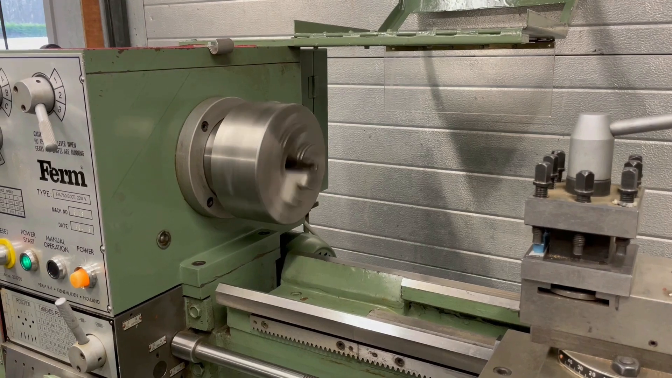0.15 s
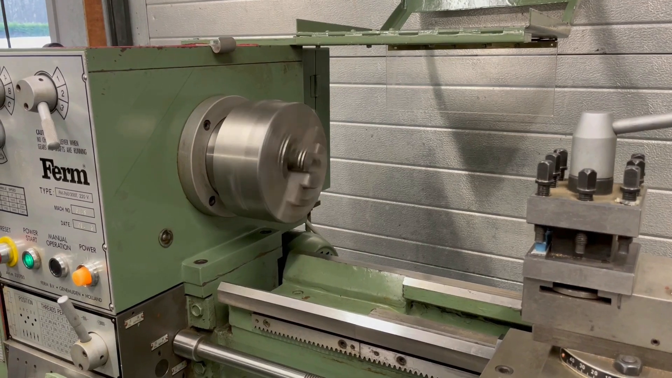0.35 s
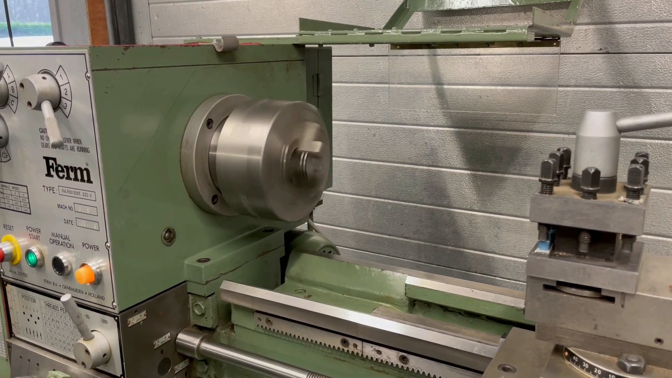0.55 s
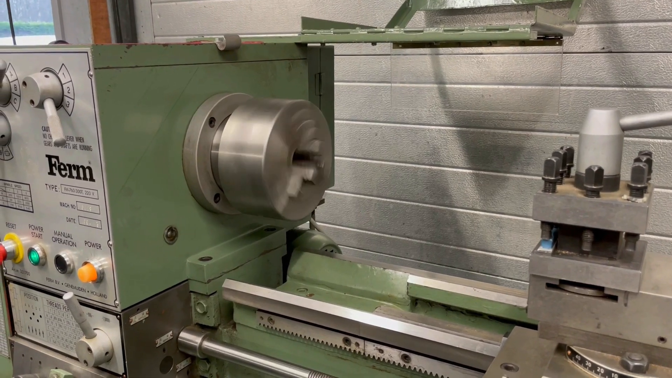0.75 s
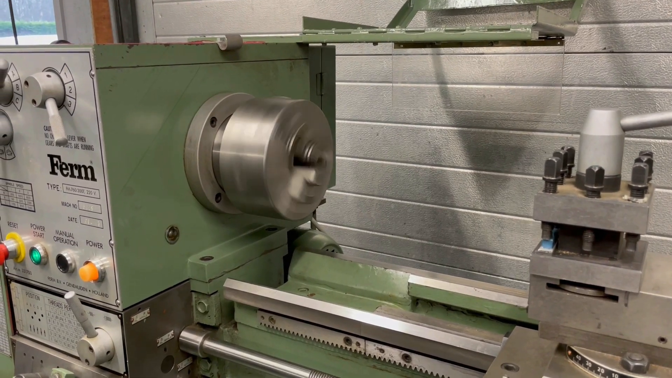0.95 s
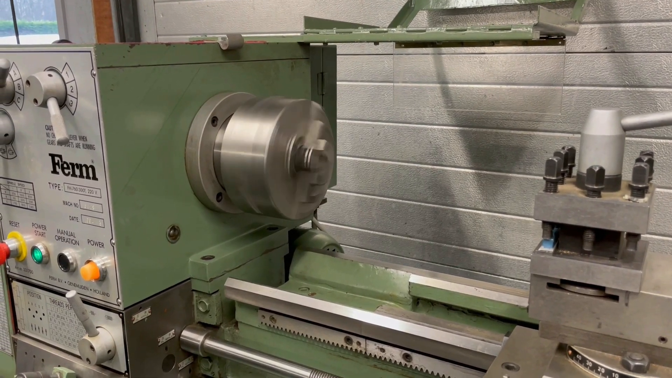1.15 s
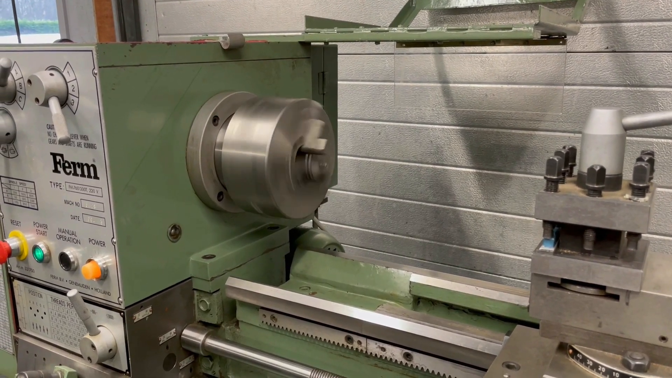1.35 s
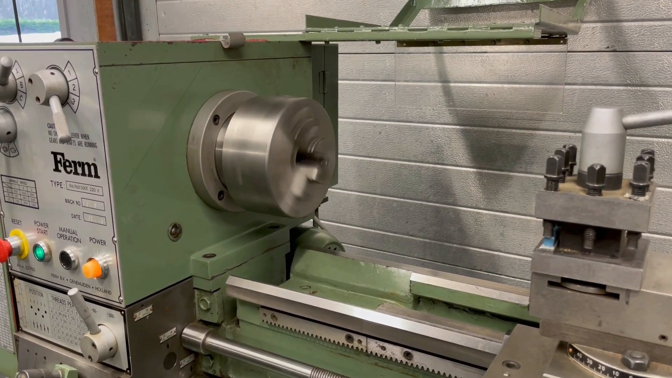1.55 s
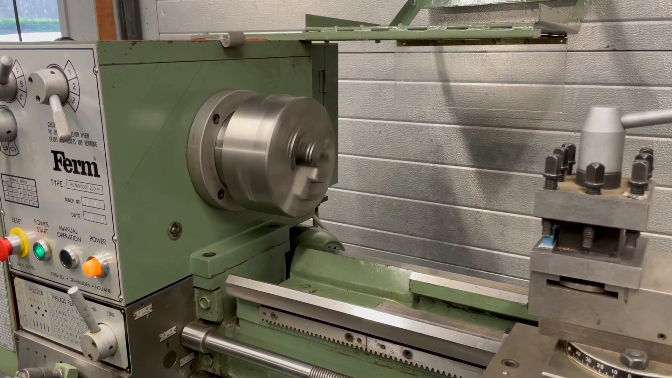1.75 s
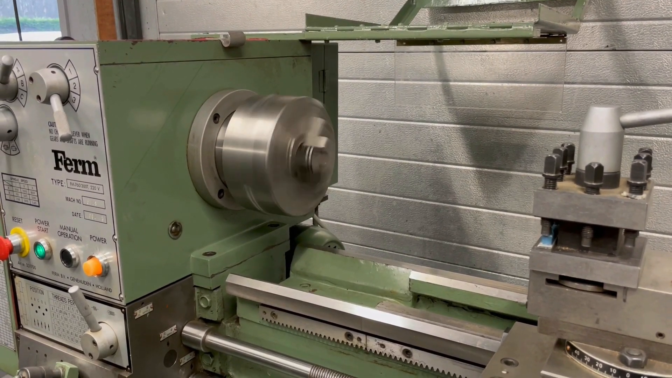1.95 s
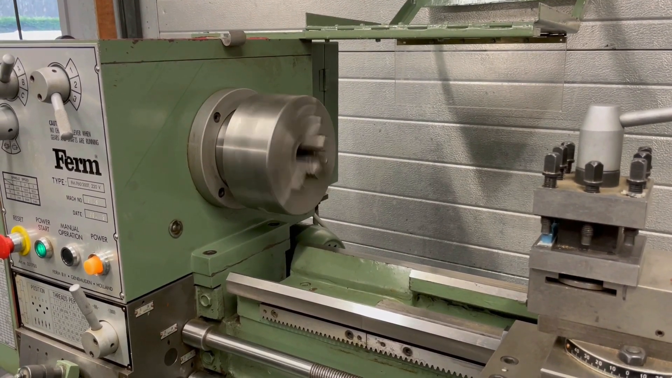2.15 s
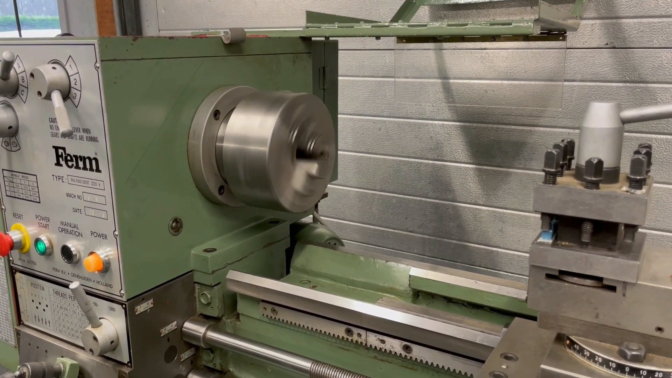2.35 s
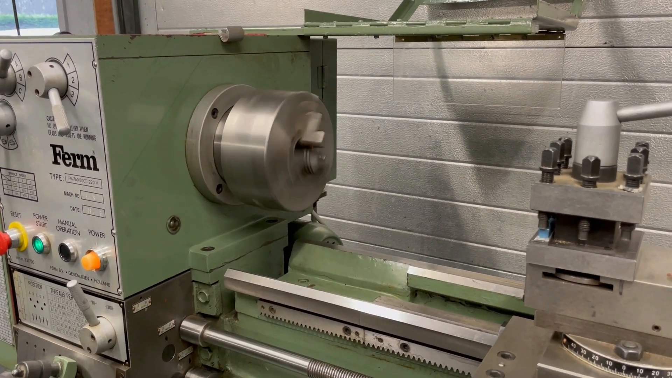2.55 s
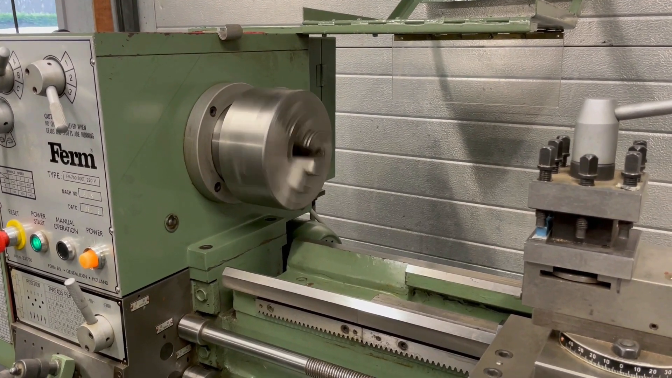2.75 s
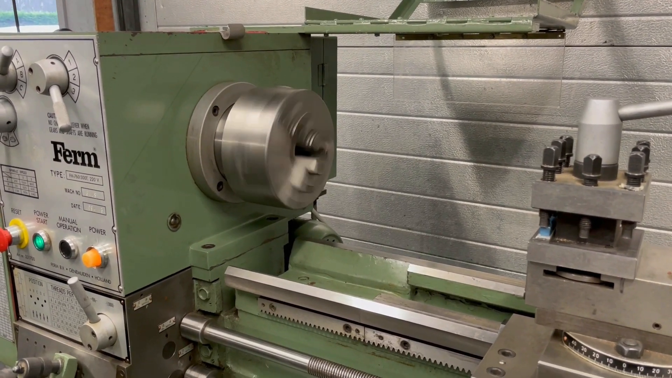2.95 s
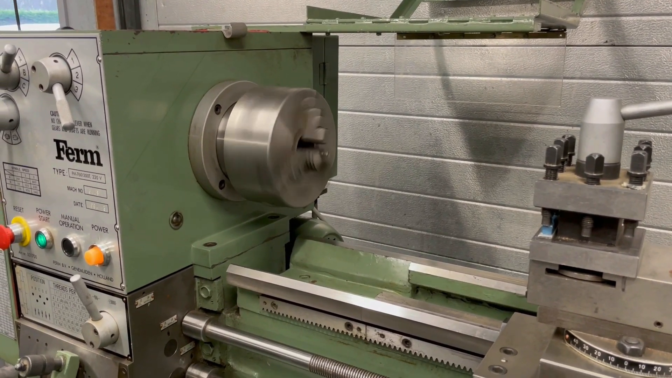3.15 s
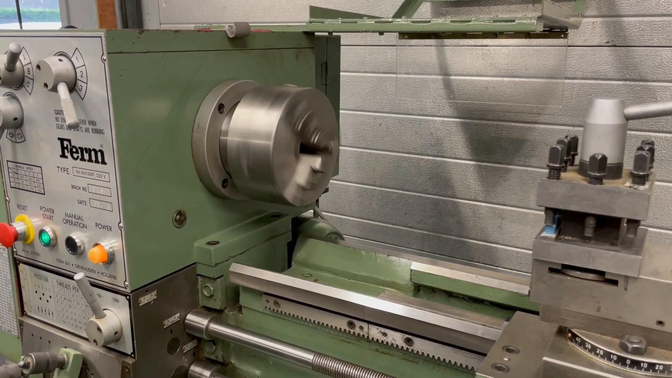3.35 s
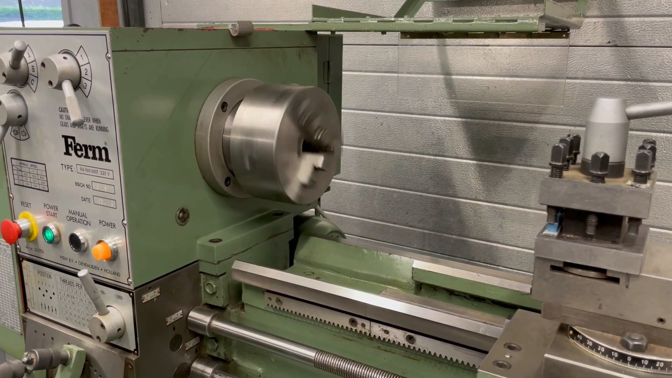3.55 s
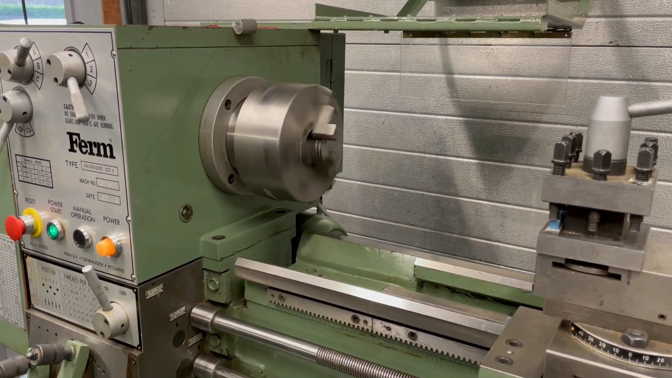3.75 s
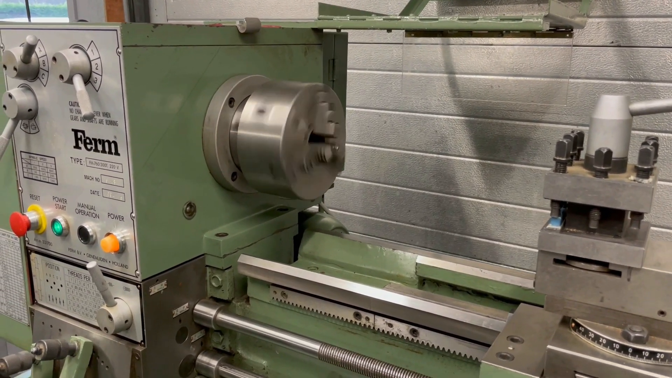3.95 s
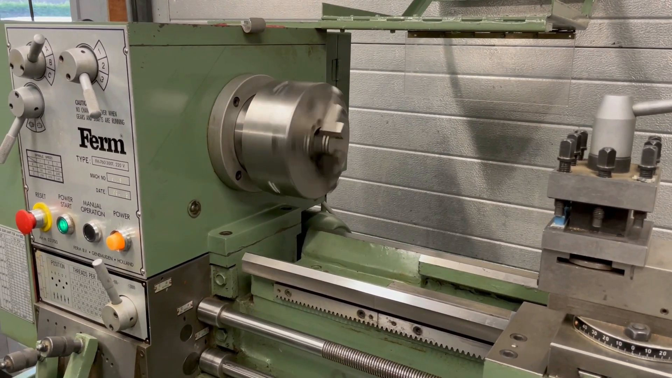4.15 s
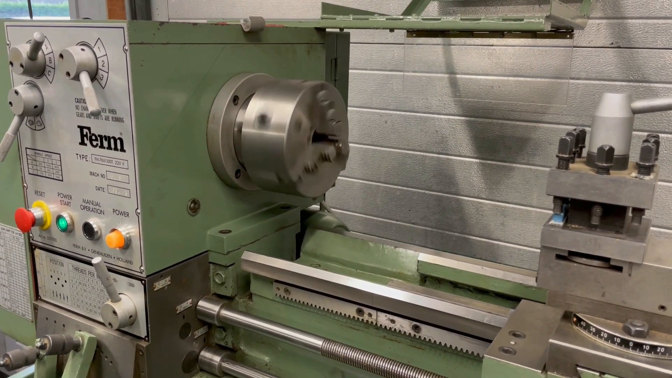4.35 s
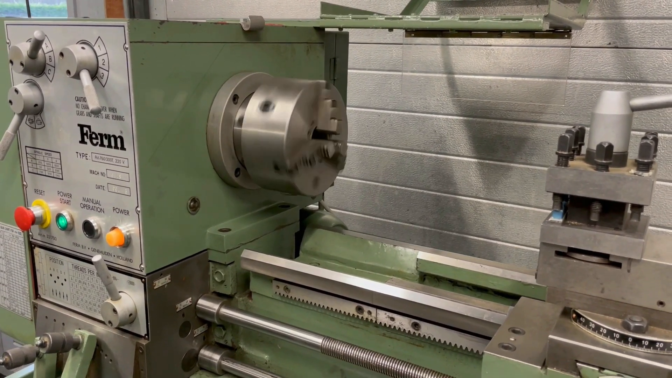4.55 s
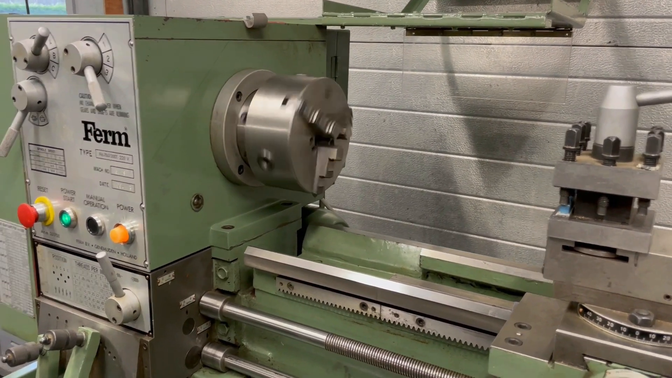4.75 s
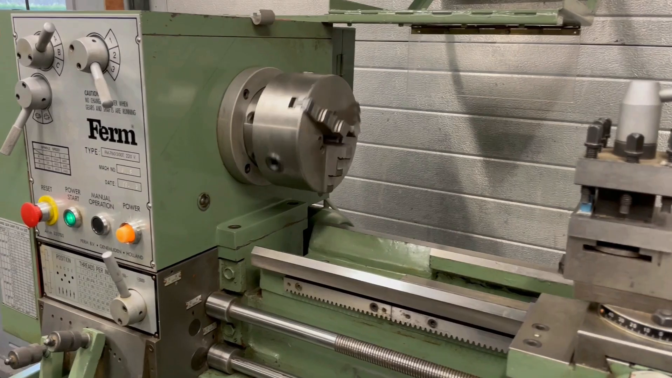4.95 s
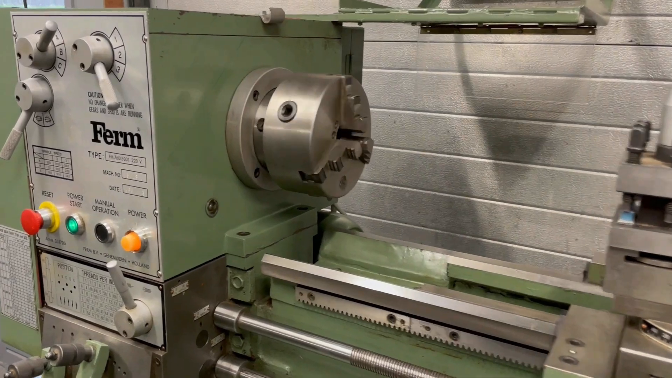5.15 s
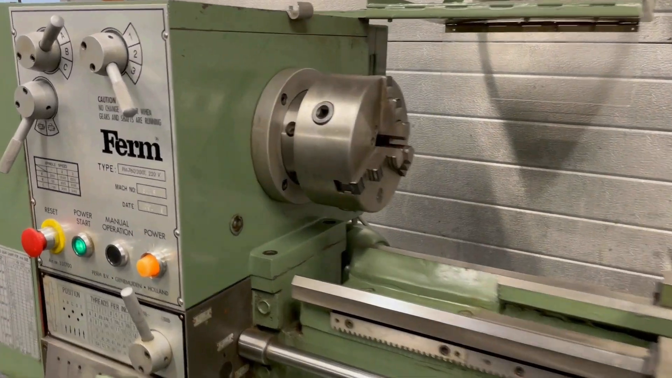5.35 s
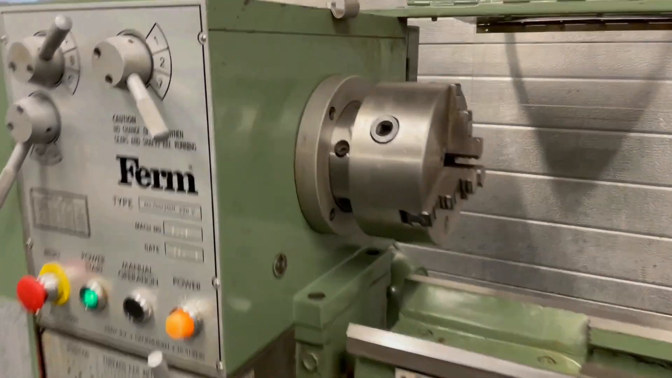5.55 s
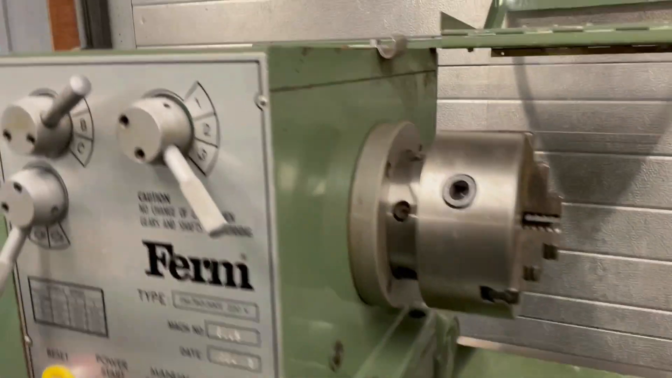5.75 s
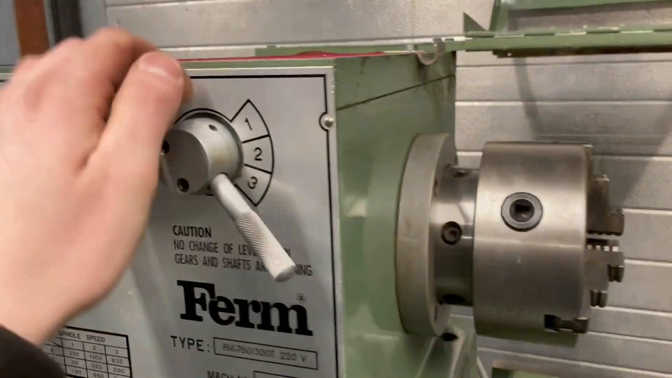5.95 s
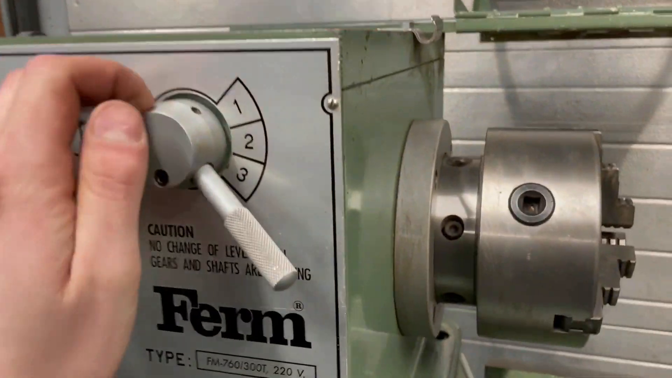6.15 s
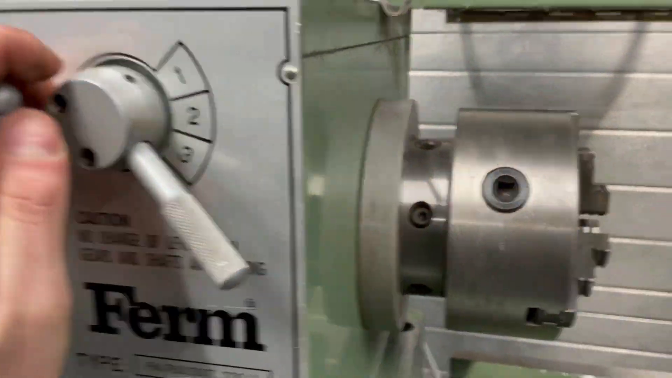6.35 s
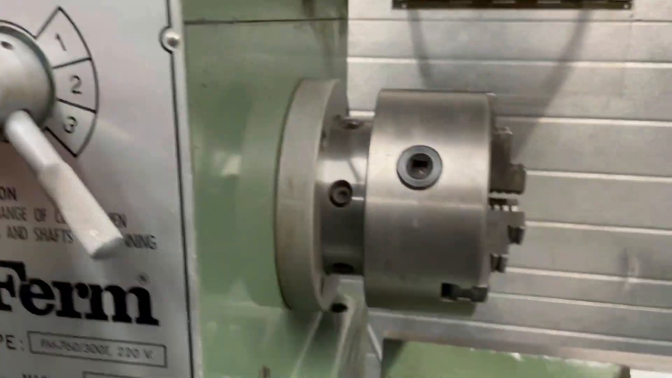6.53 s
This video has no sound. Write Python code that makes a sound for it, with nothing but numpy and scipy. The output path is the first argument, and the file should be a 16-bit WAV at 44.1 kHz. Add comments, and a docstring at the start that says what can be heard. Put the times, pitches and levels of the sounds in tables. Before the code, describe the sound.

Close in a quiet workshop, a metal lathe runs with a throbbing, buzzy gear whine over dense rattling. After about two seconds a click cuts the whine; the rattle dulls and sinks, with faint squeaks and a sharp switch snap. The gears stop, cloth rustles and a shoe scuffs, then a lever rubs and clunks firmly into place with a short echo.

```python
"""A geared lathe headstock under power whines by its tooth-mesh harmonics and rattles by noise grains ringing its case.
After the power is cut at 1.9 s the rattle thins and dulls; dry bearings squeak and a sprung switch snaps at 3.5 s.
The gears rest at 4.8 s; about then a person rustles cloth and scuffs a shoe, over low rumbles. At 5.7 s a lever
rubs and clunks into place: decaying iron modes with an echo. Ticks and blows also fall earlier, over a quiet shop
with a swelling drone. A microphone with two ports stands near."""
import sys
import numpy as np
from scipy import signal
from scipy.fft import rfft, irfft, next_fast_len
from scipy.io import wavfile
from scipy.ndimage import uniform_filter1d

SR = 44100
rng = np.random.default_rng(int(sys.argv[2]) if len(sys.argv) > 2 else 0)


def gain_from_decibels(decibels):
    """Convert decibel values to linear amplitude factors."""
    exponent = np.asarray(decibels, float) / 20
    return 10 ** exponent


def transcribe(signal):
    """Save signal, clipped to [-1, 1], as a 16-bit WAV file at the path in sys.argv[1]."""
    frames = np.atleast_2d(signal).T
    limited = np.clip(frames, -1, 1)
    pcm = np.round(limited * 32767).astype(np.int16)
    wavfile.write(sys.argv[1], SR, pcm)


N = 290619

CUT_S, STOP_S = 1.913, 4.778  # power off, gears at rest


def evened(x):
    """Normalisation to unit root-mean-square."""
    return x / np.sqrt(np.mean(x ** 2) + 1e-20)


def read(points, hz):
    """Spectral interpolation on a logarithmic frequency axis."""
    f, value = np.transpose(points)
    return np.interp(np.log(hz + 1), np.log(f + 1), value)


def resonances(modes, hz):
    """Resonance: each mode adds a rounded peak, in dB, about its natural frequency."""
    return sum(db / (1 + (2 * (hz - f) / width) ** 2) for f, width, db in modes)


def likeness(hz, factor=1):
    """Spatial coherence: how alike the sound is at the two ports."""
    # coherence of the ports: f/Hz, left-right likeness (0 to 1)
    coherence = [(60, .95), (130, .92), (290, .75), (640, .3), (3100, .35), (6000, .6), (8000, .96),
                 (10000, .96), (12500, .88), (15000, .95)]
    return np.clip(factor * read(coherence, hz), 0, 1)


def partner(a, b, same):
    """Partial correlation: a mix of a and independent b that is like a by the share same."""
    return same * a + np.sqrt(1 - same ** 2) * b


def grains(per_s, spread_db, t60):
    """Shot noise: two noises share one envelope of random bursts, each decaying exponentially."""
    size = gain_from_decibels(spread_db * np.minimum(rng.exponential(1, N), 4))
    hits = size * (rng.random(N) < per_s / SR)
    fall = gain_from_decibels(-60 / (t60 * SR))
    power = signal.lfilter([1], [1, -fall ** 2], hits ** 2)
    return np.sqrt(power + 0.0011) * rng.standard_normal((2, N))


def coloured(pair, db_of, size=1024, alike=1):
    """Time-varying filtering: shapes a noise pair over frequency and time, the filter's power held constant."""
    hz, t, (a, b) = signal.stft(pair, SR, nperseg=size, noverlap=size * 3 // 4)
    same = likeness(hz, alike)[:, None]
    shape = gain_from_decibels(db_of(hz[:, None], t))
    z = np.array([a, partner(a, b, same)]) * shape / np.linalg.norm(shape, axis=0)
    return evened(signal.istft(z, SR, nperseg=size, noverlap=size * 3 // 4)[1][:, :N])


def patches(hz, s):
    """Smoothed random field: blotches over frequency and time, rms 1."""
    field = rng.standard_normal((len(hz), len(s)))
    return evened(uniform_filter1d(uniform_filter1d(field, size=7, axis=0), size=11, axis=1))


def swells(rows, t, rise, fall, column=2):
    """Exponential growth and decay: one gain line per row climbs, holds and sinks (rise, fall in dB per s)."""
    start, hold, db = np.transpose(rows)[[0, 1, column], :, None]
    before, after = np.maximum(start - t, 0), np.maximum(t - start - hold, 0)
    return gain_from_decibels(db - rise * before - fall * after)


def leading(rows, gains, column):
    """Power-weighted mean of a column over the rows."""
    return np.transpose(rows)[column] @ gains ** 2 / (gains ** 2).sum(0)


def speed(t):
    """Constant friction: full speed (1) under power, then an even slowing to rest."""
    return np.clip((STOP_S - t) / (STOP_S - CUT_S), 1e-4, 1)


def driven(t, stall):
    """Threshold of excitation: the drive fades out below the stall share of full speed."""
    return 1 - np.exp(-(speed(t) / stall) ** 2)


def load(t):
    """Drive torque: full under power, gone just after the cut."""
    return np.clip(1 - (t - CUT_S) / 0.07, 0, 1)


def machine_gain_db(t):
    """Level curve: the machine swells under power and holds up late in the run-down."""
    # machine gain: t/s, level/dB
    gain_curve = [(0, -1), (.8, 1), (1.9, 3), (2.4, 4), (3.2, 5.5), (4.0, 5), (4.35, 3), (4.55, 11.5)]
    return np.interp(t, *np.transpose(gain_curve))


def shop(t):
    """Ambient noise: quiet shaped room tone and a deep band-limited drone that swells and fades."""
    # room tone: f/Hz, relative spectral level/dB per Hz
    tone_spectrum = [(40, -28.5), (80, -12), (125, -26), (200, -14.5), (400, 10), (700, -13), (1000, -4.5),
                     (3000, -32), (8000, -18), (13000, -28), (16000, -37)]
    # drone swells: t/s, hold/s, level/dB
    drone_swells = [(2.3, 0.067, -60), (5.0, 0.079, -60.5), (5.78, 0.071, -59)]
    tone = coloured(rng.standard_normal((2, N)), lambda hz, s: read(tone_spectrum, hz))
    band = signal.butter(2, [45, 62], "band", fs=SR, output="sos")
    drone = evened(signal.sosfilt(band, rng.standard_normal(N)))
    return gain_from_decibels(-72) * tone + swells(drone_swells, t, 15, 15).max(0) * drone


def room(x):
    """Reverberation: sparse reflections of random sign, each band decaying at its own rate."""
    # reverberation: f/Hz, t60/s
    decay = [(100, 0.66), (500, 0.42), (2000, 0.4), (6000, 0.38), (10000, 0.46), (14000, 0.057)]
    taps = np.zeros((2, SR))
    at = np.arange(200, SR - 20, 20) + rng.integers(0, 20, (2, (SR - 201) // 20))
    np.put_along_axis(taps, at, rng.choice([-1., 1.], at.shape), 1)
    hz, t, z = signal.stft(taps, SR, nperseg=512)
    z[1] = partner(z[0], z[1], likeness(hz)[:, None])
    tail = signal.istft(z * gain_from_decibels(-60 * t / read(decay, hz)[:, None]), SR, nperseg=512)[1]
    return signal.fftconvolve(x[None], tail / np.linalg.norm(tail[0]), axes=1)[:, :N]


def scuff(t):
    """Sliding friction: fine grains excite the resonances of a shoe sole."""
    # scuffs: t/s, hold/s, level/dB, pitch factor on the sole
    scuffs = [(4.84, 0.033, -67.5, 1.14), (4.97, 0.081, -58.5, 1.08), (5.15, 0.091, -57.5, 1.01)]
    # sole modes at pitch factor 1: f/Hz, width/Hz, level/dB
    sole_modes = [(428, 34, 20), (1850, 630, 15), (4170, 470, 11.5), (6300, 1100, 13)]
    gains = lambda s: swells(scuffs, s, 210, 104)

    def sole_db(hz, s):
        modes_db = resonances(sole_modes, hz / leading(scuffs, gains(s), column=3))
        return modes_db - 60 * (hz < 200) - 30 * (hz > 7500) - 6.6 * np.log2(hz / 400 + 1)

    # the scuff is less alike at the two ports than the machine
    return gains(t).max(0) * coloured(grains(1300, 1.6, 0.045), sole_db, alike=0.71)


def rustle_and_rumble(t):
    """Friction noise and low noise: cloth rustles in fine grains, each swell paired with a low rumble."""
    # movements, and the low tail of the lever's clunk at 5.9 s:
    # t/s, hold/s, cloth level/dB, brightness/dB per octave, low rumble level/dB
    moves = [(4.52, 0.081, -62.5, -6, -59), (4.9, 0.16, -64.5, -3.5, -67), (5.06, 0.016, -60, -3.5, -59.5),
             (5.15, 0.052, -61, -3.5, -67), (5.37, 0.18, -59, -0.4, -69), (5.68, 0.068, -64, -7, -72),
             (5.9, 0.039, -57.5, -8.5, -51), (6.06, 0.14, -65, -1, -59.5), (6.4, 0.087, -61.5, -2, -60.5),
             (6.57, 0.033, -58, -5, -56.5)]
    # cloth before brightness: f/Hz, relative spectral level/dB per Hz
    cloth_spectrum = [(300, -0.5), (1000, 2), (2200, -4), (3400, -3), (6000, -6), (9000, -3.5),
                      (11000, -6.5), (13500, -2.5), (15600, -13.5)]
    # low rumble: f/Hz, relative spectral level/dB per Hz
    rumble_spectrum = [(40, 0), (70, 4), (120, 7.5), (250, -1), (500, -22), (1000, -61)]
    gains = lambda s: swells(moves, s, 190, 54)

    def weave_db(hz, s):
        bright = leading(moves, gains(s), column=3)
        return read(cloth_spectrum, hz) + bright * np.log2(np.maximum(hz, 1500) / 6000)

    cloth = gains(t).max(0) * coloured(grains(2200, 0.76, 0.04), weave_db, alike=0.71)
    rumble = coloured(rng.standard_normal((2, N)), lambda hz, s: read(rumble_spectrum, hz))
    return cloth + swells(moves, t, 55, 96, column=4).max(0) * rumble


def switch(t):
    """Free vibration: the slowing motor lets a sprung switch snap back; each bounce rings its parts unevenly."""
    # small steel parts, means that each bounce varies at random: f/Hz, level/dB, then t60/s
    parts = [(2180, -41.5, 0.21), (3010, -36.5, 0.095), (4670, -45, .04), (5130, -48, 0.07)]
    # drop-out and bounce: t/s, level over the parts/dB
    bounces = [(3.533, -1), (3.546, 1)]
    out = np.zeros(N)
    for s, snap_db in bounces:
        u = np.maximum(t - s, 0)
        for hz, db, t60 in parts:
            uneven, detune = rng.standard_normal(2)
            level_db = np.maximum(snap_db + db + 1.4 * uneven - 60 * u / t60, -200)
            out += gain_from_decibels(level_db) * np.sin(2 * np.pi * hz * (1 + 0.0066 * detune) * u)
    return out


def lever(t):
    """Sliding friction: the lever rubs with rising level just before it drops in."""
    rub = coloured(grains(1250, 1.0, 0.049), lambda hz, s: -30 * np.log10(1 + ((hz - 1100) / 500) ** 2))
    level = gain_from_decibels(np.interp(t, [5.66, 5.72, 5.744], [-75, -58, -57]))
    return level * (t > 5.66) * (t < 5.75) * rub


def ticks():
    """Transient noise: short bright decaying bursts, only partly alike at the two ports."""
    # sharp ticks: t/s, level before onset smoothing/dB, lowest f/Hz, t60/s
    tick_rows = [(1.925, -45.5, 9000, 0.078), (2.0952, -27, 3000, 0.024), (3.534, -44, 2800, 0.022),
                 (3.5364, -37.5, 3500, 0.055), (3.546, -41, 3500, 0.042), (3.558, -46, 3800, 0.069),
                 (4.2594, -60, 3850, .027), (4.317, -59, 3850, .027), (4.4654, -60, 3850, 0.023),
                 (4.7042, -63, 3830, .027), (5.089, -53, 5000, 0.025), (5.732, -45, 6000, 0.017),
                 (5.7416, -38.5, 3830, 0.07), (6.121, -52.5, 3000, 0.03), (6.4273, -43.5, 3730, 0.024),
                 (6.443, -41, 3850, 0.013)]
    out, u = np.zeros((2, N + SR)), np.arange(SR // 4) / SR
    for s, db, low_hz, t60 in tick_rows:
        band = signal.butter(2, [low_hz, 14800], "band", fs=SR, output="sos")
        a, b = evened(signal.sosfilt(band, rng.standard_normal((2, len(u)))))
        burst = np.array([a, partner(a, b, 0.46)])
        onset = 1 - np.exp(-u / 0.00093)
        out[:, round(s * SR):][:, :len(u)] += gain_from_decibels(db - 60 * u / t60) * onset * burst
    return out[:, :N]


def blows():
    """Modal excitation: each blow rings the iron about a favoured pitch; low modes beat, upper ones cluster."""
    # blows on cast iron: t/s, relative level/dB, favoured f/Hz, octaves to the -6 dB points, factor on t60
    blow_rows = [(1.922, -33, 250, 0.54, 0.21), (3.536, -31.5, 1920, 1.5, 0.82),
                 (3.95, -41, 2260, 0.59, 0.51), (3.974, -37, 990, 0.99, 0.25), (4.42, -50, 1400, .4, 0.27),
                 (4.265, -44, 1490, 0.57, 0.6), (4.8135, -49, 1580, 0.3, 0.18),
                 (4.821, -54, 1410, 0.27, 0.2), (4.822, -51.5, 410, 0.51, .3),
                 (4.705, -64, 1660, 0.35, 0.27), (5.39, -64, 1100, 0.29, 2.2),
                 (5.743, -25, 2470, 1.2, 0.13), (5.7483, -26, 2280, 0.78, 0.11),
                 (5.749, -16.5, 250, 1.74, 0.18), (5.7529, -24, 410, 1.8, 0.043),
                 (6.121, -57.5, 1480, 2.5, 0.41), (6.266, -55, 826, 0.31, 0.09),
                 (6.431, -45, 360, 0.83, 0.18), (6.441, -53.5, 2514, 1.2, 0.14),
                 (6.565, -58, 1700, 0.15, 0.97)]
    # iron modes before favour and damping: f/Hz, relative level/dB, t60/s
    iron = [(116.6, -38.5, 13), (126, -8, 0.55), (178, -11, 0.7), (250, 2, 0.3), (307, -4, 0.29),
            (370, -1, 0.17), (412, 6, 0.27), (443, 1.5, 0.17), (522, -0.5, 0.14), (672, 1.5, 0.22),
            (760, -5, .2), (1080, -6, 0.3), (1357, 1, 0.21), (1700, 1, 0.2), (2100, 2, 0.2),
            (2366, 0, 0.15), (2685, -7, 0.12), (3250, -13, 0.2), (3720, -2, 0.25), (4230, -10, 0.15),
            (5150, -5, 0.3), (6500, -11, 0.2)]
    beat = 0.3  # share of close neighbours beating with a low mode
    crowd_width = 0.18  # noise bandwidth about an upper mode as a share of its pitch
    out, u = np.zeros(N + SR), np.arange(SR) / SR
    for s, blow_db, mid_hz, octaves, damping in blow_rows:
        ring = np.zeros(len(u))
        for hz, db, t60 in iron:
            favour_db = -6 * (np.log2(hz / mid_hz) / octaves) ** 2
            slow = signal.butter(2, crowd_width * hz, fs=SR, output="sos")
            crowd = evened(signal.sosfilt(slow, rng.standard_normal((2, len(u)))))
            if hz > 800:
                sine, cosine = crowd
            else:  # a steady sine plus neighbours; the longest mode stays pure
                sine, cosine = beat * crowd * (t60 < 1) + [[1], [0]]
            wave = sine * np.sin(2 * np.pi * hz * u) + cosine * np.cos(2 * np.pi * hz * u)
            ring += gain_from_decibels(db + favour_db - 60 * u / (t60 * damping)) * wave
        ring *= 1 - np.exp(-u * mid_hz / 2.7)  # lower blows rise more slowly
        ring /= np.sqrt(np.mean(ring[:600] ** 2))
        out[round(s * SR):][:len(u)] += gain_from_decibels(blow_db - 6.5) * ring
    return signal.sosfilt(signal.butter(2, 90, "high", fs=SR, output="sos"), out[:N])  # iron is too small to boom


def oil_hiss(t):
    """Rolling friction: bearings and oil hiss in fine grains, weaker with falling speed."""
    # hiss: f/Hz, relative spectral level/dB per Hz
    hiss_spectrum = [(2000, -10), (5000, -2), (8000, 15), (11000, 7.5), (13500, 8), (14400, 3),
                     (14900, -25)]
    level = gain_from_decibels(-56 + machine_gain_db(t)) * speed(t) ** 1.65
    return level * coloured(grains(2100, 3.6, 0.059), lambda hz, s: read(hiss_spectrum, hz))


def squeaks(t):
    """Stick-slip: a dry bearing chirps as it slows, as narrow-band noise."""
    # squeaks: t/s, hold/s, level/dB, f/Hz
    squeak_rows = [(2.565, .035, -56, 4000), (2.712, .012, -53, 3900), (2.762, .022, -53, 4200)]
    pitch = lambda s: leading(squeak_rows, swells(squeak_rows, s, 400, 400) + 1e-9, column=3)
    narrow_db = lambda hz, s: -40 * np.log10(1 + ((hz - pitch(s)) / 200) ** 2)
    chirp = coloured(rng.standard_normal((2, N)), narrow_db, size=512)
    return swells(squeak_rows, t, 700, 600).max(0) * chirp


def backlash_knocks(t):
    """Impact noise: teeth knock about in their backlash, fewer per second as the speed falls."""
    left_at_rest = 0.24  # share of the knock rate
    per_s = 1600 * (left_at_rest + (1 - left_at_rest) * speed(t))
    knocks = grains(per_s, 2.0, 0.17)
    return knocks / np.sqrt(uniform_filter1d(knocks ** 2, 6000, axis=1))


def side_panel(knocks, t):
    """Forced resonance: the knocks drive two close panel modes, heard as one flat-topped band that swells."""
    # panel swells: t/s, hold/s, level/dB
    booms = [(.98, 0.038, -43.5), (1.84, 0.015, -46), (2.06, .08, -43), (2.93, 0.085, -47),
             (3.14, 0.11, -39.5), (3.39, 0.014, -42.5), (4.24, 0.012, -53)]

    def modes_db(hz, s):
        below_db = 40 * np.log10(1 + ((hz - 375) / 22) ** 2) * (hz < 375)
        above_db = 40 * np.log10(1 + ((hz - 425) / 22) ** 2) * (hz > 425)
        return 3 * patches(hz, s) - below_db - above_db

    level = gain_from_decibels(-47) * driven(t, 0.15) + swells(booms, t, 180, 190).max(0)
    return level * coloured(knocks, modes_db, size=2048) * (t < STOP_S)


def rattle(knocks, t):
    """Modal filtering: the knocks ring the gear case, weaker and duller as the speed falls."""
    # gear case: f/Hz, relative spectral level/dB per Hz
    case_spectrum = [(24, -51), (40, -24.5), (204, -23), (404, -13.5), (518, -8.5), (1310, 2), (1440, -1),
                     (1720, 1), (2060, -9.5), (2420, -8), (2960, -9.5), (7010, -29), (9000, -93)]
    # ringing panels: f/Hz, width/Hz, level over the case/dB
    panel_modes = [(250, 9, 24.5), (589.4, 14, 19), (1014, 6, 4.5), (1160, 7, 11.5), (1238, 16, 5.5),
                   (1272, 84, 3), (1310, 9.3, 8), (1590, 58, 3.5), (1750, 24, 8), (2260, 410, 6)]

    def case_db(hz, s):
        bright = -1.09 + load(s) - 4.5 * (1 - speed(s))  # dB per octave
        patchy_db = 1 + (0.88 - 1) * load(s)  # uneven colour, loose and loaded
        bed_db = 16.5 * (.5 - speed(s)) * (1 - load(s))  # the heavy bed keeps rumbling as the gears slow
        tilt_db = bright * np.log2(np.maximum(hz, 250) / 1200)
        body_db = read(case_spectrum, hz) + resonances(panel_modes, hz)
        return bed_db * (hz < 330) + patchy_db * patches(hz, s) + body_db + tilt_db

    level = gain_from_decibels(-32 + 1.5 * load(t) + machine_gain_db(t)) * speed(t) ** 1.238 * driven(t, 0.11)
    return level * coloured(knocks, case_db, size=2048)


def whine(t):
    """Gear mesh: loaded teeth sound harmonics, swayed once a turn by shaft run-out, that die with the power."""
    # mesh harmonics: multiple, level/dB, throb once a turn/dB, radians left leads, left over right/dB
    mesh = [(2, -1.5, -2.5, 1.0, -2.5), (3, -1, 1.5, -1.8, 0), (4, 4, 4, -.3, -5), (5, -2.5, 3, -1.8, 1.5),
            (6, -13, 1, 0, 0), (7, -3, .7, .2, -3), (8, -9, 4, -.8, -2), (9, -16, 1, 0, 0)]
    mesh_hz, shaft_hz = 423.4, 5.15  # teeth meeting and shaft turns per second
    high_spot_s = 0.12  # a moment when the high spot of the gear is in mesh
    sway = 0.062 * np.sin(2 * np.pi * shaft_hz * t + 1.6)
    wander = 0.11 * evened(uniform_filter1d(rng.standard_normal(N), 3000))
    turns = 2 * np.pi * mesh_hz * t + sway + wander
    throb = np.cos(2 * np.pi * shaft_hz * (t - high_spot_s))
    ports = np.array([[.5], [-.5]])
    tones = np.zeros((2, N))
    for k, db, throb_db, lead, lean_db in mesh:
        shared = uniform_filter1d(rng.standard_normal(N), size=1300)
        separate = uniform_filter1d(rng.standard_normal((2, N)), size=1300)
        waver_db = 2.1 * evened(shared + 0.65 * separate)
        level = gain_from_decibels(db + waver_db + throb_db * throb + lean_db * ports)
        tones += level * np.cos(k * turns + rng.uniform(0, 2 * np.pi) + lead * ports)
    hum = coloured(rng.standard_normal((2, N)), lambda hz, s: resonances([(108.5, 67, 92)], hz))  # motor
    return gain_from_decibels(-33 + machine_gain_db(t)) * load(t) * (evened(tones) + gain_from_decibels(-31) * hum)


def scene():
    """Superposition of the shop, the person, the hits with their echo, and the machine."""
    t = np.arange(N) / SR
    sharp, heavy = ticks(), blows()
    echo = room(gain_from_decibels(-6.5) * sharp[0] + gain_from_decibels(-1.0) * heavy)
    hits = lever(t) + switch(t) + sharp + heavy + echo
    knocks = backlash_knocks(t)
    machine = oil_hiss(t) + squeaks(t) + side_panel(knocks, t) + rattle(knocks, t) + whine(t)
    return shop(t) + scuff(t) + rustle_and_rumble(t) + hits + machine


def band_limit(x):
    """A steep low-pass at the top of the band."""
    return signal.sosfilt(signal.butter(12, 15750, fs=SR, output="sos"), x)


def record(dry):
    """Two-port reception: the ports differ in level and phase, opposed near 9 kHz; bass and top are cut."""
    # level difference: f/Hz, left over right/dB
    lean = [(60, -2.5), (180, -2.5), (550, -0.5), (1650, 2.5), (4970, 3.5), (15000, -2)]
    # phase difference: f/Hz, radians left leads
    phase = [(0, 0), (4600, .5), (6400, -.9), (7700, -2.6), (8700, -3.14), (9600, -3.6), (12300, -6.1),
             (22050, -6.28)]
    size = next_fast_len(N)
    hz = np.fft.rfftfreq(size, 1 / SR)
    half = gain_from_decibels(read(lean, hz) / 2) * np.exp(.5j * np.interp(hz, *np.transpose(phase)))  # half to each port
    band = (hz < 15750) / (1 + (45 / (hz + 1)) ** 4)
    ports = irfft(rfft(dry, size) * [half, 1 / half] * band, size)[:, :N]
    return band_limit(ports)


dry = scene()
out = record(dry)
transcribe(out)
```